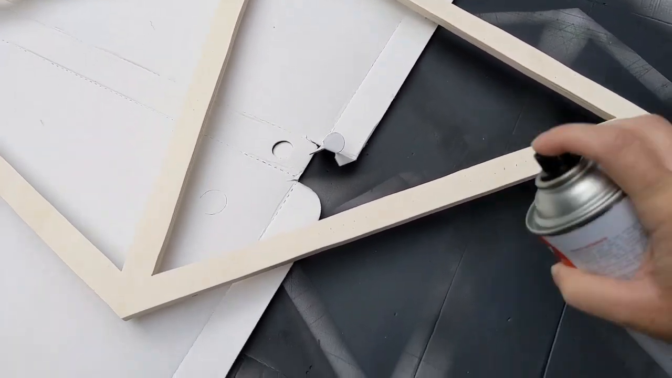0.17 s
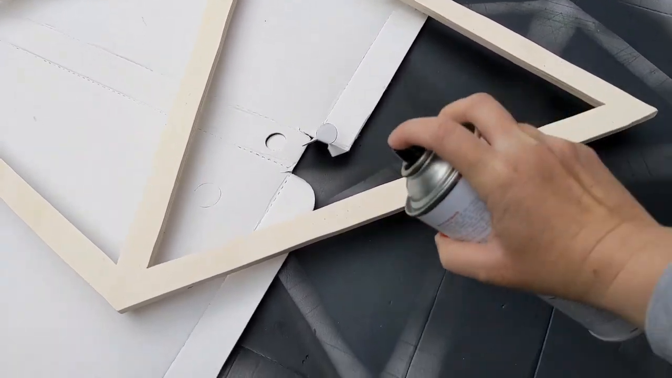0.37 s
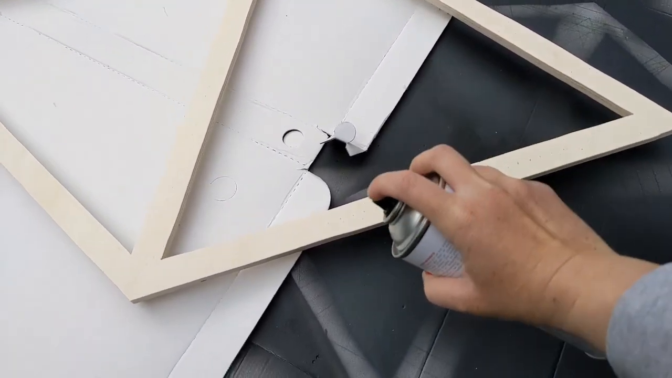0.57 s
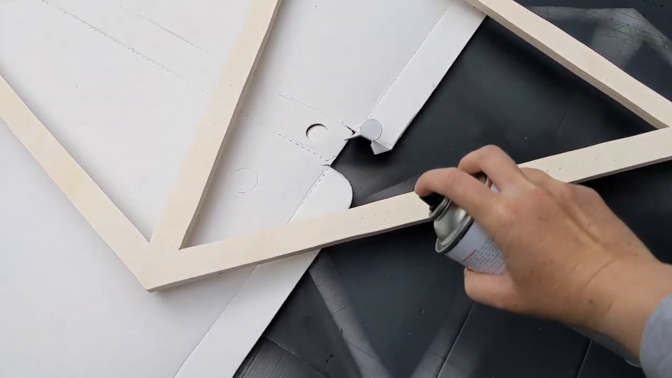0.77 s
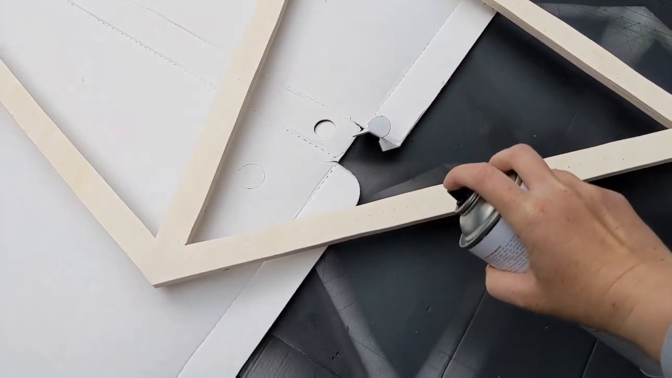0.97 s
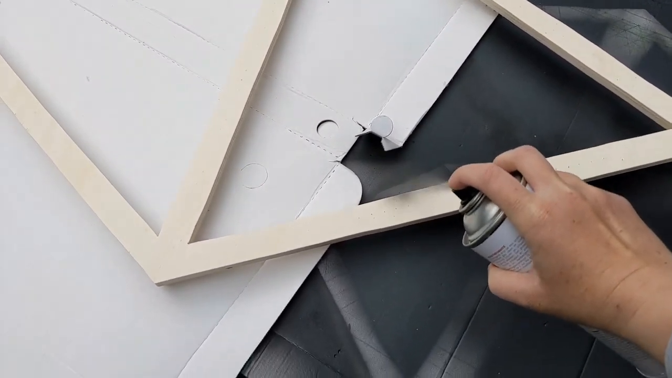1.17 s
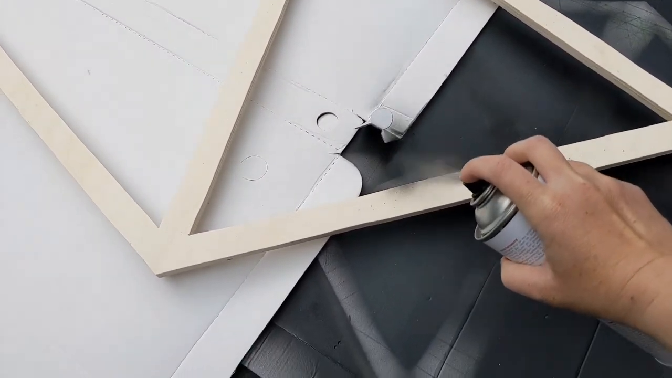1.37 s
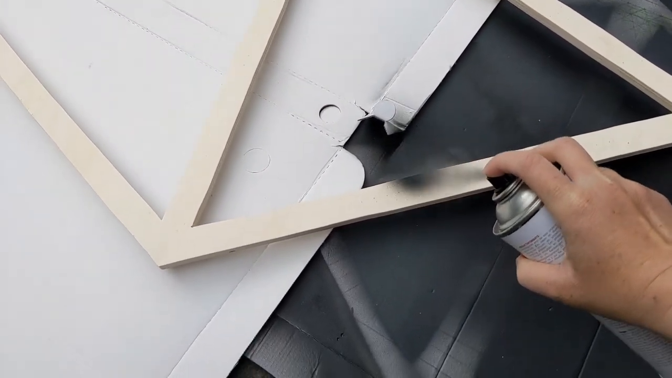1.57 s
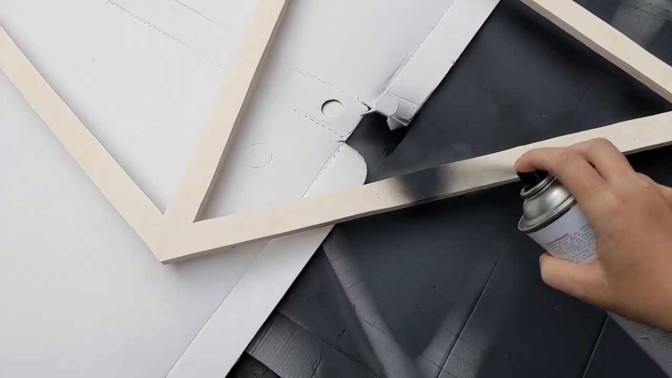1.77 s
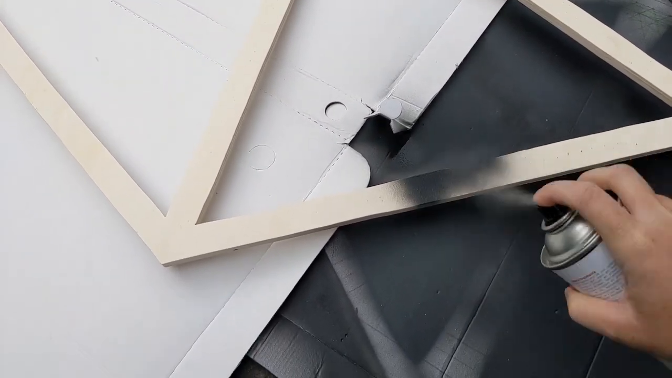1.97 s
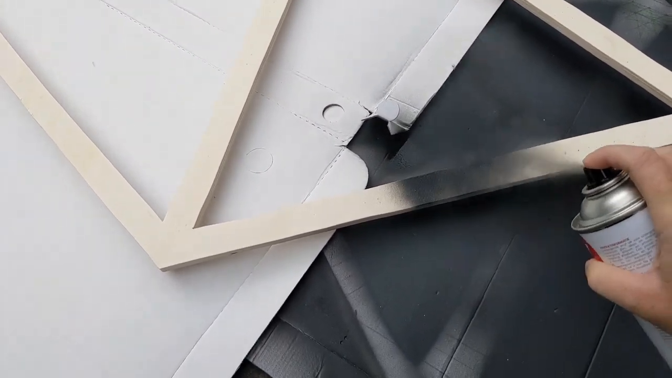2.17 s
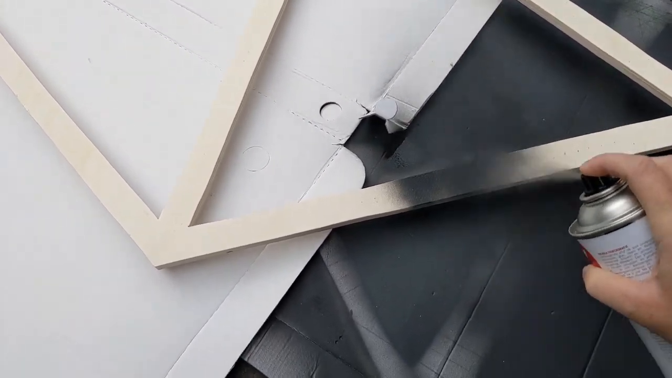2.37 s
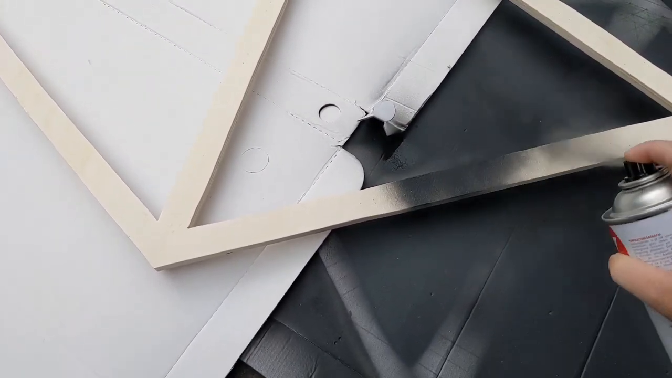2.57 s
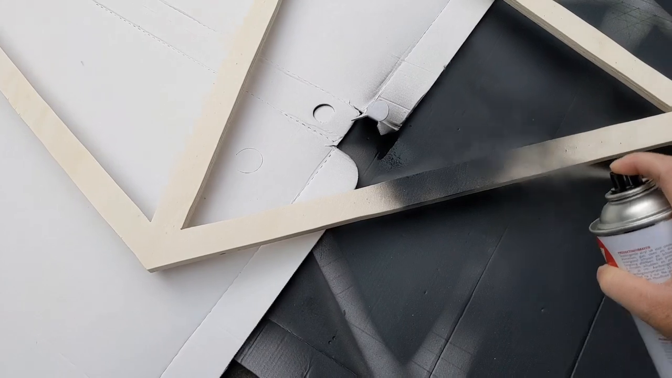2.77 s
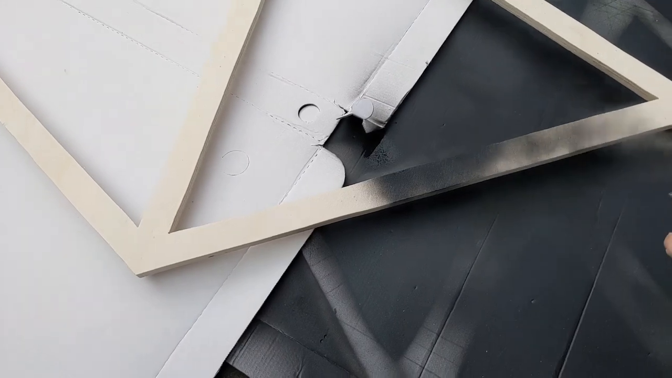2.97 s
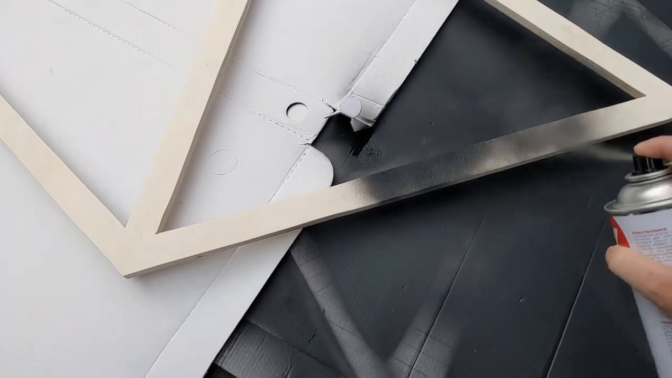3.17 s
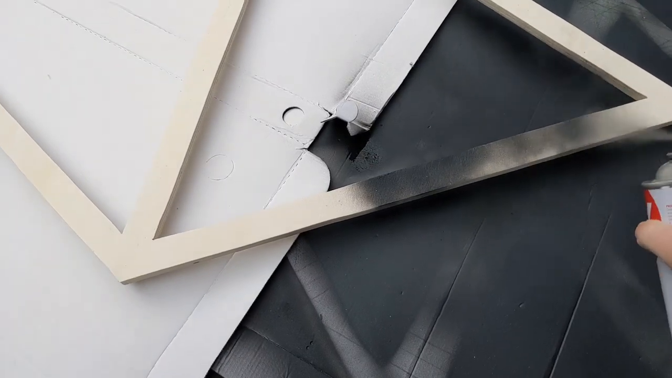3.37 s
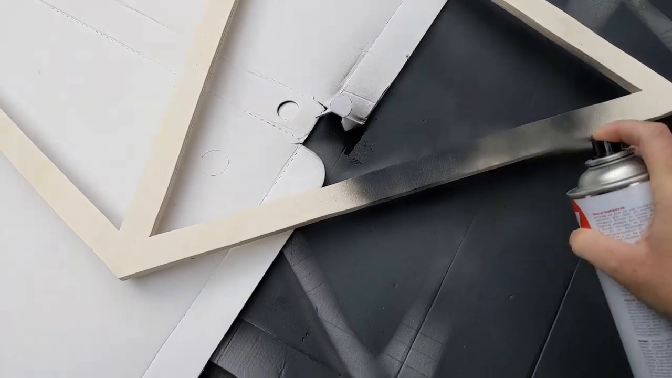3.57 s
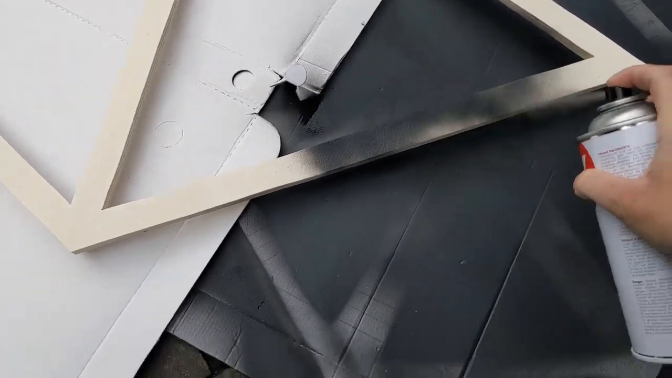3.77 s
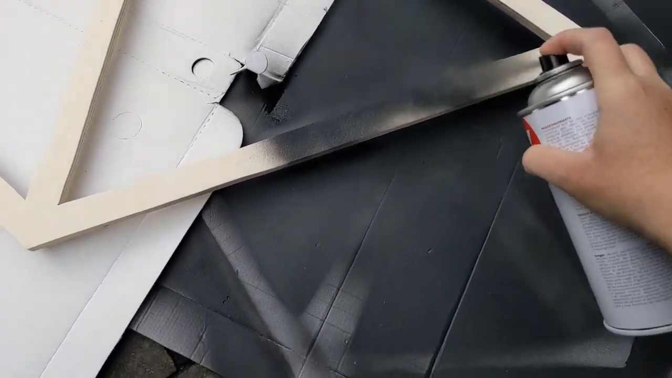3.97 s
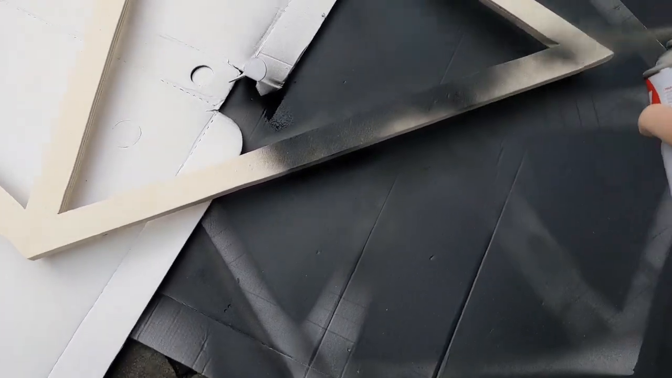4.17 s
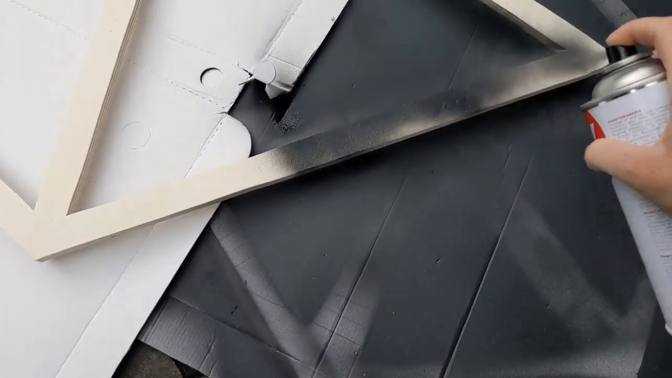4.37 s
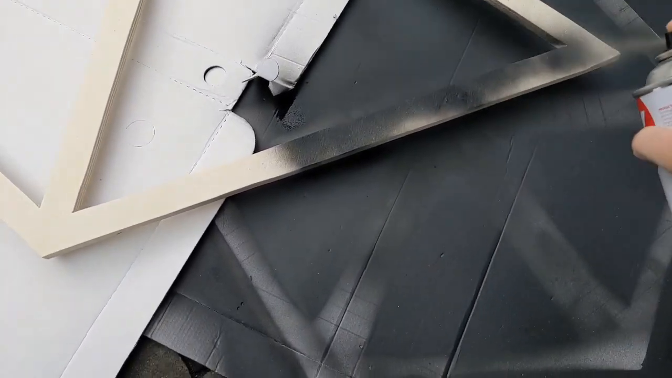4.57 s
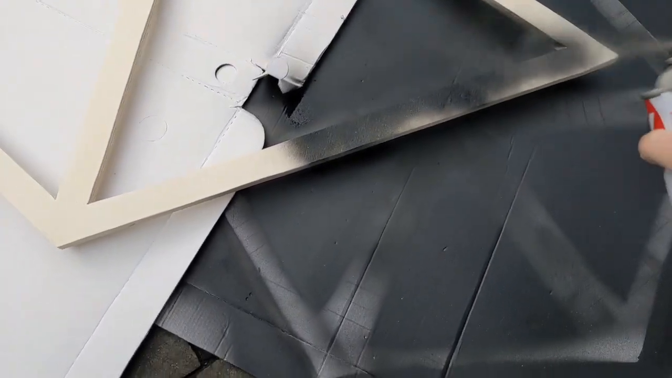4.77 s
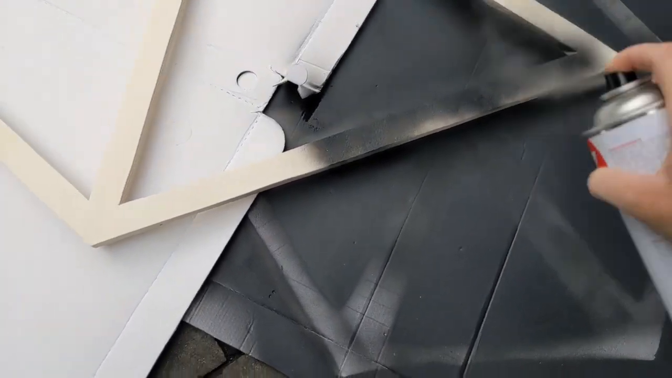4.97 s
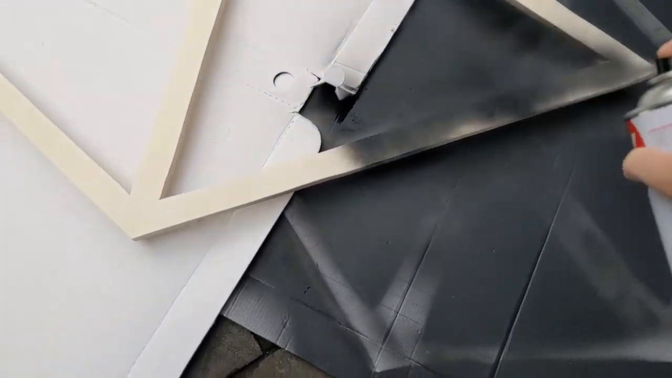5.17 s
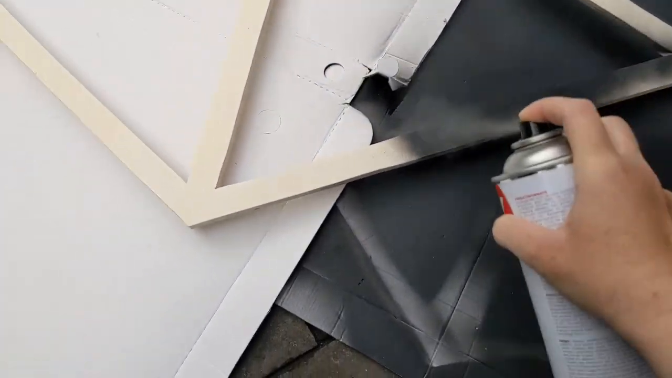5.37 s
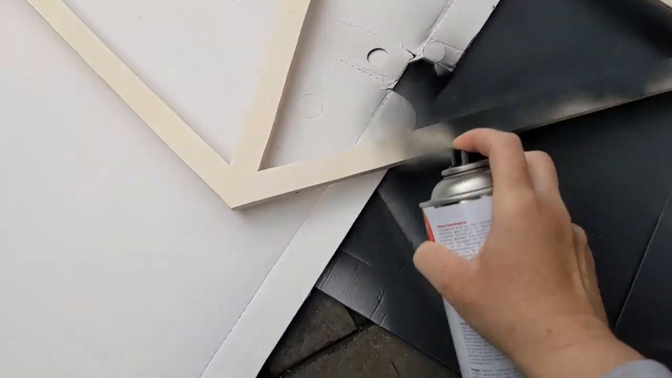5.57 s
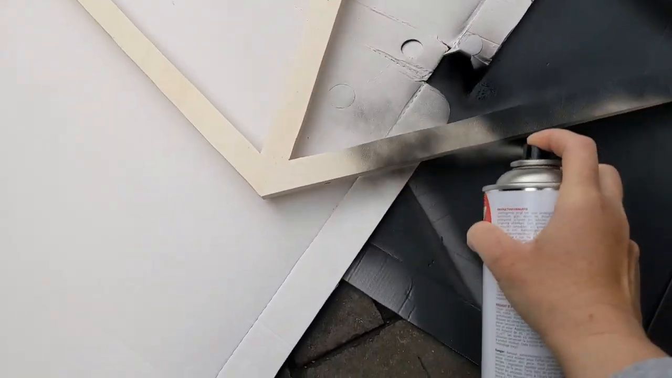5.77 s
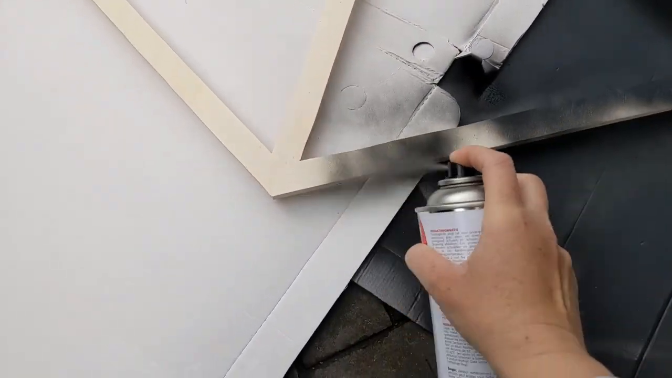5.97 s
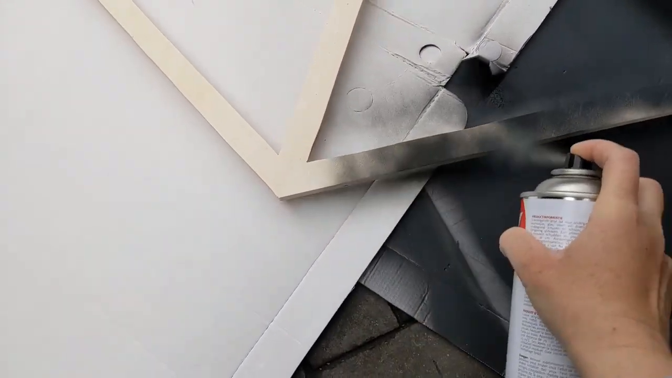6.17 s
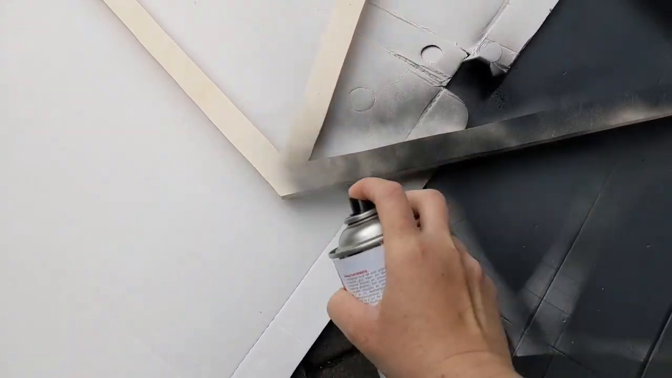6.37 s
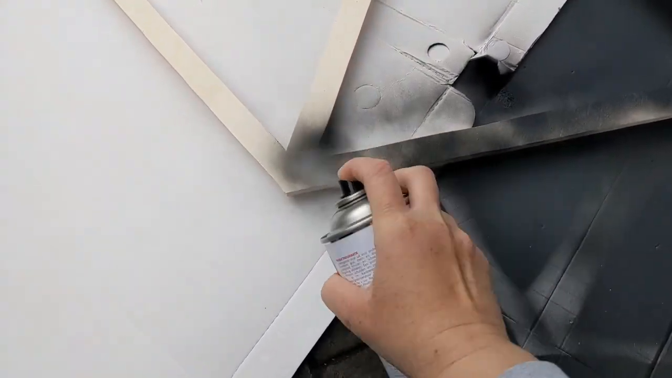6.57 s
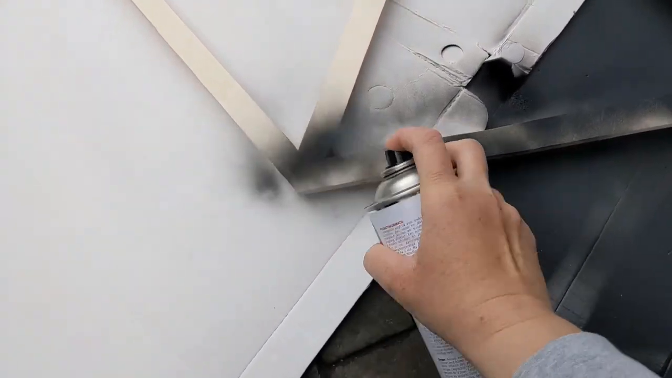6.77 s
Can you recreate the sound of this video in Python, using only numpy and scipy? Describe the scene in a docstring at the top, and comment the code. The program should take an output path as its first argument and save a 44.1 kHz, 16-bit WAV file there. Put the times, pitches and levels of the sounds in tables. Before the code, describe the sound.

Outdoors, a brief metallic rattle from an aerosol can gives way to a long hiss of spray paint, over wind bumps and faint traffic.

```python
"""A mixing ball rattles to rest in an aerosol can, each impact ringing the modes of the shell.
Wind buffets mostly the left of two microphone ports, over distant traffic and a droning motor.
Then the valve opens: a turbulent jet of gas hisses, and rushing paint rings the dip tube and valve.
The hand drifts and strokes before a wooden frame, moving the echo off its board and the lag between
the ports, so that interference sweeps the hiss. The ball clicks twice more near the end."""
import sys
import numpy as np
from scipy import signal
from scipy.fft import rfft, irfft, next_fast_len
from scipy.io import wavfile
from scipy.ndimage import uniform_filter1d, map_coordinates

SR = 44100
rng = np.random.default_rng(int(sys.argv[2]) if len(sys.argv) > 2 else 0)


def pcm_store(signal):
    """Save signal as 16-bit PCM."""
    levels = np.round(np.clip(np.atleast_2d(signal), -1, 1) * 32767)
    wavfile.write(sys.argv[1], SR, levels.astype(np.int16).T)


N = 301203
T = np.arange(N) / SR

# colour and place of the gas: (time [s], top band [dB], left minus right [dB], lift at 7.8 kHz [ratio])
GAS_COLOUR = [(1.0, 1.5, 3, 0.46), (1.25, 0.5, 2, 0.48), (1.6, -2, 0, -0.12), (2.2, 2.5, 0.5, -0.018),
              (2.6, 0, 0, 0.046), (3.0, -2, -0.5, -0.086), (3.7, 0.5, 0.5, -0.12), (4.4, -1, 0.2, -0.24),
              (5.2, -3.5, -1, -0.31), (5.6, -1, 2, 0.051), (6.1, 0, 0.5, -0.14), (6.4, -0.5, 1, -0.24),
              (6.83, -3, 1, -0.099)]


def undb(db):
    """Decibels to amplitude ratio."""
    return 10 ** (np.asarray(db) / 20)


def unit(x):
    """Normalisation to an RMS of 1."""
    return x / np.sqrt(np.mean(x ** 2))


def curves(table):
    """Linear interpolation of each column against the first, time."""
    times, *columns = np.transpose(table)
    return [np.interp(T, times, column) for column in columns]


def rise(start_s, rise_s):
    """First-order step response, from 0 towards 1."""
    return 1 - np.exp(-np.clip(T - start_s, 0, None) / rise_s)


def walk(rate):
    """Slow random modulation: values held 1 / rate s and smoothed twice; spread near 1."""
    hold = int(SR / rate)
    steps = np.repeat(rng.standard_normal(N // hold + 1), hold)
    return 1.92 * uniform_filter1d(uniform_filter1d(steps, hold), hold)[:N]


def band_noise(points, flicker_db, rate, bands):
    """Noise of unit RMS shaped by (frequency [Hz], density [dB]); each band flickers on its own."""
    size = next_fast_len(N)
    log_hz = np.log(np.arange(1, size // 2 + 2) * SR / size)
    hz, db = np.transpose(points)
    knots = np.log(hz)
    spectrum = rfft(rng.standard_normal(size)) * undb(np.interp(log_hz, knots, db, -90, -90))
    place = (log_hz - knots[0]) / (knots[-1] - knots[0]) * (bands - 1)
    parts = (irfft(spectrum * np.clip(1 - abs(place - k), 0, 1), size)[:N] for k in range(bands))
    return unit(sum(part * undb(flicker_db * walk(rate)) for part in parts))


def resonance(x, hz, q, gain):
    """A second-order resonance added to the signal; negative gain cuts a dip."""
    return x + gain * signal.lfilter(*signal.iirpeak(hz, q, fs=SR), x)


def delay(x, ms, order=3):
    """Fractional delay, steady or moving, by spline interpolation."""
    return map_coordinates(x, [np.arange(N) - ms * SR / 1000], order=order)


def chatter(count):
    """Inelastic bounces: flights shorten geometrically and blows weaken. Rows as for the ball."""
    start_s, flight_s, restitution = .4778, .0156, .84
    k = np.arange(count)
    times = start_s + flight_s * (1 - restitution ** k) / (1 - restitution)
    return list(zip(times, -36.5 - k, np.full(count, -12.5)))


def mixing_ball():
    """Modal ringing: each impact excites the paint-damped shell in its own mix, with a short rustle."""
    # blows of the ball on the can: (time [s], level [dB], relative treble [dB])
    impacts = [(0.0004, -15, -6), (0.053, -18, -15), (0.1577, -19.5, -11), (0.2212, -22.5, -12),
               (0.2629, -24, -15), (0.2814, -19.5, -6), (0.2905, -25.5, -12), (0.3333, -28.5, -14),
               (0.3673, -31.5, -14), (0.394, -36, -12), (0.4187, -36, -16), (0.4363, -40, -7),
               (0.4474, -41, -15), (0.4574, -24, -2), (0.5815, -33, -5), (0.5996, -40, -5),
               (0.6114, -46, -6), (0.6165, -47, -4), (6.6528, -23.5, 2), (6.6945, -38, 1)]
    # modes of the shell: (frequency [Hz], bandwidth [Hz], relative level [dB])
    shell_modes = [(1140, 300, 4.5), (1470, 330, 8), (1800, 350, 6), (2150, 220, 13), (2350, 400, -11),
                   (3530, 500, 12), (4760, 420, 18), (5470, 530, 18.5), (6500, 400, 18), (7500, 560, 17.5),
                   (10300, 600, 12), (12800, 1400, 17)]
    out, t = np.zeros(N + 4000), np.arange(4000) / SR
    blows = impacts + chatter(count=10)
    hz, width, db = np.transpose(shell_modes)[:, :, None]
    chance = rng.standard_normal((len(blows), 2, len(shell_modes), 1))
    rustle_band = signal.butter(2, [1200, 6500], "bandpass", fs=SR, output="sos")
    rustles = signal.sosfilt(rustle_band, rng.standard_normal((len(blows), 4000)))
    contact = 1 - np.exp(-t * hz / .35)  # the wall takes part of a cycle to give
    for (s, level_db, treble_db), (mix, tune), rustle in zip(blows, chance, rustles):
        bright_db = treble_db + .3 * (level_db + 20)  # softer blows are duller
        gain = undb(db + 2 * mix + bright_db * (hz > 3500))
        envelope = gain * contact * np.exp(-np.pi * width * t)
        ring = np.sum(envelope * np.sin(2 * np.pi * hz * (1 + .04 * tune) * t), axis=0)
        click = undb(bright_db + 11) * np.exp(-t / .00032)
        tail = undb(bright_db - 14.5) * np.exp(-t / .02)
        out[int(s * SR):][:4000] += undb(level_db) * (ring / np.max(abs(ring)) + (click + tail) * rustle)
    return out[:N]


def hand_motion():
    """Path length sets delay: port lag and echo lag [ms] move as the hand drifts, strokes, trembles."""
    # drift of the can: (time [s], lag of left port behind right [ms], lag of board echo [ms])
    drift = [(0, .1, 1.33), (.6, .05, 1.1), (1.08, .006, .924), (1.35, .018, .935), (1.75, .037, .885),
             (1.95, .072, .915), (2.07, .075, .933), (2.5, .09, .945), (3.18, .115, .938),
             (3.4, .108, .935), (3.75, .075, .96), (4.0, .07, .98), (4.55, .09, 1.08), (4.8, .093, 1.2),
             (5.15, .095, 1.25), (5.4, .062, 1.28), (5.58, .035, 1.236), (5.87, .022, 1.064),
             (6.21, .035, 1.085), (6.42, -.03, 1.105), (6.55, -.047, 1.118), (6.83, -.045, 1.145)]
    # far turns of the strokes: (time [s], swing of port lag [ms], swing of echo lag [ms])
    strokes = [(1.95, 0, 0), (2.35, -.02, .036), (2.76, -.022, .04), (3.18, -.02, .04), (3.58, -.015, .028),
               (3.99, -.045, .04), (4.4, -.028, .03), (4.79, -.018, .01), (5.1, -.013, .01),
               (5.4, -.028, .015), (5.68, -.035, .02), (5.98, -.042, .02), (6.42, -.04, .015),
               (6.67, -.014, .01), (6.95, -.014, .01)]
    cycles = np.interp(T, np.transpose(strokes)[0], np.arange(len(strokes)))
    lag_ms, echo_ms = curves(drift) + np.cos(2 * np.pi * cycles) * curves(strokes)
    return lag_ms, echo_ms + .01 * walk(9.9)


def arrive(pair, lag_ms):
    """Time difference of arrival: the left port hears lag_ms later than the right."""
    return np.array([delay(pair[0], .2 + lag_ms, order=5), delay(pair[1], .2, order=5)])


def reflections(x, lag_ms, echo_ms, echo, edge, scatter, waver):
    """Comb filtering: at each port the direct sound interferes with echoes off board, rail and more."""
    # faint echoes off frame, hand and ground: (lag [board lags], left gain [ratio], right gain [ratio])
    faint_echoes = [(.31, -0.0075, -0.042), (0.575, -0.14, 0.25), (1.3, -0.061, -0.16),
                    (1.901, -0.22, 0.18)]
    reflected = x - edge * delay(x, .058)  # the board's edge scatters an inverted copy
    rail_lag = .87  # in board lags: the wooden rail answers first
    pair = []
    for port, ms in enumerate((echo_ms, echo_ms + .35 * lag_ms)):
        faint = sum(gains[port] * (1 + waver * walk(3)) * np.interp(T - lag * ms / 1000, T, x)
                    for lag, *gains in faint_echoes)
        rail = np.interp(T - rail_lag * ms / 1000, T, waver * .5 * walk(4) * reflected)
        board = delay(echo * undb(3 * waver * walk(4.82)) * reflected, ms)
        pair.append(x + rail + board + scatter * faint)
    return arrive(pair, lag_ms)


def wind():
    """Turbulent pressure: small eddies push both membranes at random, strong ones the left in pulses."""
    # wind on the left port: (time [s], level [dB])
    gusts = [(0.05, -48), (0.21, -38.5), (0.37, -42), (0.53, -47), (0.69, -37), (0.85, -43.5), (1.01, -51),
             (1.17, -58), (1.33, -34), (1.49, -38), (1.65, -33.5), (1.81, -34.5), (1.97, -32.5),
             (2.13, -39), (2.29, -56), (2.45, -48), (2.61, -55), (2.77, -46), (2.93, -34.5), (3.09, -40),
             (3.25, -30.5), (3.41, -38.5), (3.57, -34.5), (3.73, -40), (3.89, -34.4), (4.05, -34.5),
             (4.21, -37), (4.37, -35.5), (4.53, -42), (4.69, -42), (4.85, -32.5), (5.01, -40.5),
             (5.17, -42), (5.33, -34), (5.49, -46.5), (5.65, -46), (5.81, -59), (5.97, -62), (6.13, -67),
             (6.29, -62), (6.45, -63), (6.61, -59), (6.77, -57)]
    # strongest eddies: (time [s], level [dB], frequency [Hz])
    buffets = [(0.591, -20.5, 109), (1.376, -18.5, 107), (1.412, -20.5, 105), (1.586, -15, 90),
               (1.784, -22.5, 133), (1.909, -14, 91), (2.031, -19, 102), (2.087, -23, 77),
               (2.844, -19.5, 92), (2.986, -21, 132), (3.051, -24, 89), (3.283, -24.5, 93), (3.38, -20, 86),
               (3.613, -16, 102), (3.853, -25, 82), (3.921, -20, 101), (3.965, -28, 89),
               (4.058, -21.5, 120), (4.219, -20.5, 107), (4.284, -25, 99), (4.85, -22, 111),
               (5.108, -32, 111), (5.379, -24.5, 132)]
    # small eddies: (frequency [Hz], relative density [dB])
    spectrum = [(33, -15), (56, -3), (80, -6.5), (130, -17), (300, -29.5)]
    t = np.arange(-2000, 2000) / SR
    pulses = np.zeros((2, N + 4000))
    for s, level_db, hz in buffets:
        envelope = undb(level_db) * np.exp(-(t * hz / .47) ** 2)
        pulses[0, int(s * SR):][:4000] += envelope * np.cos(2 * np.pi * hz * t - 1.3)
    eddies = [unit(band_noise(spectrum, 1.2, rate=18, bands=2) * undb(2 * walk(30))) for _ in range(2)]
    left_db = curves(gusts)[0]
    right_db = -53.5 + .2 * (left_db + 40) + 4.5 * walk(4)  # sheltered, with gusts of its own
    return pulses[:, 2000:N + 2000] + undb([left_db, right_db]) * eddies


def traffic():
    """Distant traffic, coherent between the ports only in the lows; above, each port has its own faint hiss. A
    far motor drones near 200 Hz."""
    # background wash, distant traffic in the lows and faint hiss above: (frequency [Hz], relative density [dB])
    spectrum = [(71, -6), (120, -4.5), (211, -9), (280, -9.5), (323, -12), (710, -24), (923, -22),
                (1020, -22.5), (1180, -23), (1830, -23.5), (2860, -35.5), (6290, -43.5), (15000, -55.5)]
    # drone of the motor: (time [s], level [dB])
    motor_level = [(0, -74), (.8, -53.5), (1.4, -50.5), (2.2, -46.5), (3, -51.5), (3.8, -50), (5, -56.5),
                   (6.83, -61)]
    common, *own = (band_noise(spectrum, 1.5, rate=3.9, bands=6) for _ in range(3))
    lows = signal.lfilter(*signal.butter(1, 1500, "low", fs=SR), common + .21 * np.array(own))
    highs = signal.lfilter(*signal.butter(1, 1500, "high", fs=SR), own)
    motor = band_noise([(150, -12), (185, -1), (220, -2.5), (260, -22)], 3, rate=11, bands=2)
    return undb(-50) * (lows + 1.6 * highs) + undb(curves(motor_level)[0]) * motor


def jet_flow():
    """Amplitude modulation: gas and paint share one sputtering flow."""
    # strength of the jet: (time [s], level [dB])
    flow_level = [(1.3, -36), (1.49, -34.5), (1.68, -33.5), (1.87, -36.5), (2.06, -35.5), (2.25, -36.5),
                  (2.44, -34.5), (2.63, -36.5), (2.82, -34.5), (3.01, -36), (3.2, -34), (3.39, -35.5),
                  (3.58, -35), (3.77, -38), (3.96, -35.5), (4.15, -36.5), (4.34, -37.5), (4.53, -35.5),
                  (4.72, -33.5), (4.91, -35.5), (5.1, -35), (5.29, -35), (5.48, -35.5), (5.6, -38),
                  (5.74, -36), (5.86, -34.5), (6.05, -37), (6.17, -36), (6.3, -35.5), (6.37, -38),
                  (6.44, -35), (6.62, -40), (6.72, -38), (6.77, -34), (6.82, -37.5)]
    return undb(curves(flow_level)[0] + .3 * walk(18) + .75 * walk(70))


def gas_jet(paint_s):
    """Turbulent jet noise as the valve leaks, then snaps open. Rows: core, left plume, right plume."""
    # body, top band and airy highest band of the hiss: (frequency [Hz], relative density [dB])
    body_spectrum = [(300, -8), (700, -9), (1500, -8), (2500, -8), (3200, -3), (5600, -5.5), (6500, -3.5),
                     (7600, -5), (9300, -6.5), (9900, -39)]
    top_spectrum = [(9100, 1), (9700, 1.5), (10400, 4), (11000, -1.5), (12000, -1), (13500, -12)]
    air_spectrum = [(10600, -12), (12000, -2), (13500, -1), (15000, 3), (16500, 1)]
    # airy band against the body: (time [s], level [dB])
    air_level = [(1.1, -3), (1.45, 0.5), (1.65, -2.5), (1.9, -1), (2.05, 0), (2.2, -6), (2.35, 1),
                 (2.6, -4), (2.95, -3), (3.15, -2), (3.3, -2), (3.45, -4), (3.75, -4), (4.0, 0.5),
                 (4.15, -3), (4.3, 3), (4.45, -6), (4.65, -2), (4.8, -10), (4.92, 1), (5.1, -5), (5.4, -4),
                 (5.65, -3.5), (6.0, -2.5), (6.25, -3), (6.42, -1), (6.6, 5), (6.83, 0)]
    top_db, _, lift = curves(GAS_COLOUR)
    leak = undb(-27.5) * rise(.97, .0035)
    opening = rise(1.068, .019) * undb(-1.5 * (1 - rise(paint_s, .011)))  # softer until paint arrives
    rows = []
    for bright_db in (-.6, .6, .6):  # the plume is brighter than the core
        body = resonance(band_noise(body_spectrum, .6, rate=13, bands=5), 7800, 2.6, lift)
        top = undb(top_db - 4.5) * band_noise(top_spectrum, .6, rate=24.6, bands=1)
        air = undb(curves(air_level)[0]) * band_noise(air_spectrum, .6, rate=20, bands=1)
        rows.append(body + undb(bright_db) * (top + air))
    return (leak + opening) * rows


def diffraction(pair):
    """Diffraction round the body brings the right port two later copies, at about the same total power."""
    # bent copies of the gas hiss: (time [s], gain of inverted first [ratio], gain of second [ratio])
    copy_gains = [(1.0, .1, 0), (1.8, 0.22, 0.074), (2.3, 0.24, 0.14), (2.8, 0.35, 0.28), (3.4, 0.92, 0.41),
                  (3.8, 0.22, 0.18), (4.1, 0.54, 0), (4.7, 0.99, 0.54), (5.2, 0.48, 0.37),
                  (5.5, 0.22, 0.19), (6.0, 0.4, 0.31), (6.83, .6, 0)]
    first, second = curves(copy_gains)
    left, right = pair
    right = right - first * delay(right, .055) + second * delay(right, .165)
    return np.array([left, right / np.sqrt(1 + first ** 2 + second ** 2)])


def paint_jet(start_s):
    """Flow-driven resonance: paint rings the dip tube and valve. Rows: core, left plume, right plume."""
    # lower ring, and upper ring at three times its pitch: (frequency [Hz], relative density [dB])
    low_spectrum = [(450, -26), (620, -4.5), (720, 0), (800, 2.5), (880, -1.5), (1000, -4.5), (1300, -20),
                    (1500, -39)]
    high_spectrum = [(1150, -15.5), (1400, -12), (1850, -7.5), (2150, -3.5), (2450, 0), (2750, -13.5),
                     (3500, -74)]
    # lower ring against the upper: (time [s], level [dB])
    low_level = [(1.2, -3), (1.9, -1.5), (2.25, -5), (2.6, 1), (4, -3.5), (4.5, -6.5), (5.2, -7),
                 (5.8, -3.5), (6.2, -6.5), (6.83, -6.5)]
    # paint in the jet: (time [s], level [dB], focus of the upper ring [0-1])
    paint_share = [(1.3, -2.5, 0.3), (1.8, -3, 0.86), (2.1, 0, 1), (2.3, 1, 0.8), (2.5, -3, 0.94),
                   (3.4, -3.5, 0.3), (3.8, -1, 0), (4.4, -1, 0), (5.2, -1.5, 0), (5.7, 0.5, 0.2),
                   (5.95, -1.5, 0), (6.4, 0.5, 0), (6.83, 0, 0)]
    level_db, focus = curves(paint_share)
    spurt_db = 2.5 * (1.5 - rise(start_s, .03))
    rows = []
    for _ in range(3):
        high = resonance(band_noise(high_spectrum, .58, rate=16, bands=3), 2120, 8.9, focus)
        low = undb(curves(low_level)[0]) * band_noise(low_spectrum, .28, rate=15, bands=2)
        rows.append(high + low)
    return rise(start_s, .011) * undb(level_db + spurt_db) * rows


def scene():
    """Superposition at two ports: both hear the jet's core, and each its own part of the plume."""
    paint_s = 1.232  # paint reaches the nozzle
    flow = jet_flow()
    gas, paint = flow * gas_jet(paint_s), flow * paint_jet(paint_s)
    lag_ms, echo_ms = hand_motion()
    gas_core = reflections(gas[0], lag_ms, echo_ms, echo=.34, edge=.87, scatter=.8, waver=.4)
    gas = diffraction(gas_core) + undb(-4) * gas[1:]
    paint_core = arrive([paint[0], paint[0]], 1.15 * lag_ms)  # low sound bends round the body: more lag
    paint = paint_core + undb(-13.5) * paint[1:]
    rattle = reflections(mixing_ball(), lag_ms, echo_ms, echo=.26, edge=1, scatter=2.9, waver=0)
    pan_db = curves(GAS_COLOUR)[1] * np.array([[.5], [-.5]])
    spray = undb(pan_db - 3.5) * gas + undb(-4) * paint
    return undb([[1.5], [1.2]]) * rattle + wind() + traffic() + spray


def record(dry):
    """Cavity resonance colours each port; filters cut the deepest lows and the top."""
    left = resonance(dry[0], 660, q=2.2, gain=-.49)
    left = resonance(left, 8540, q=3.8, gain=.65)
    right = resonance(dry[1], 6650, q=17, gain=.52)
    both = signal.sosfilt(signal.butter(2, 35, "high", fs=SR, output="sos"), [left, right])
    return signal.sosfilt(signal.ellip(12, .3, 55, 15720, fs=SR, output="sos"), both)


dry = scene()
out = record(dry)
pcm_store(out)
```